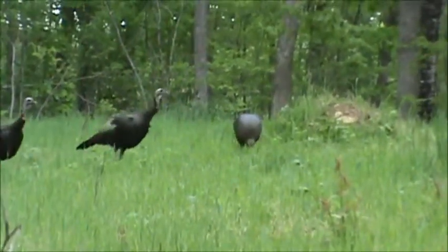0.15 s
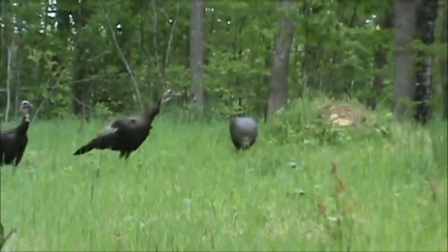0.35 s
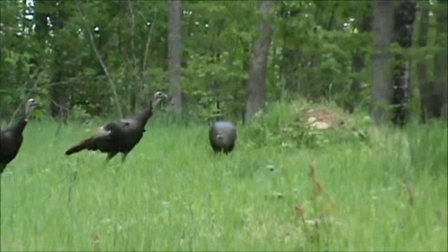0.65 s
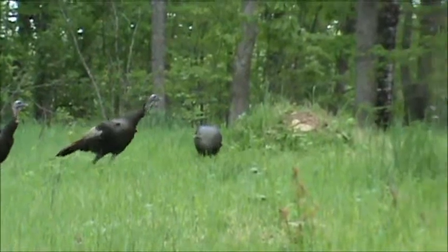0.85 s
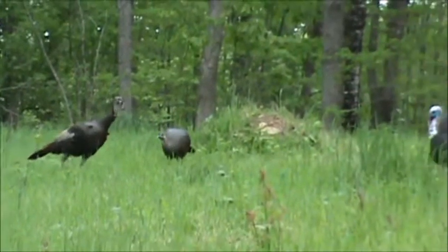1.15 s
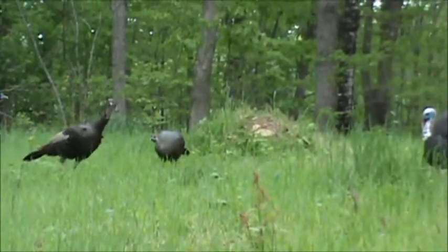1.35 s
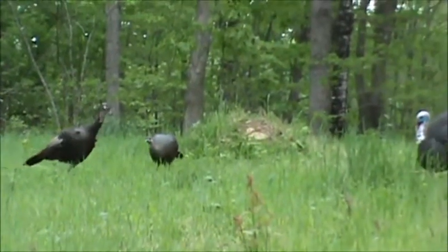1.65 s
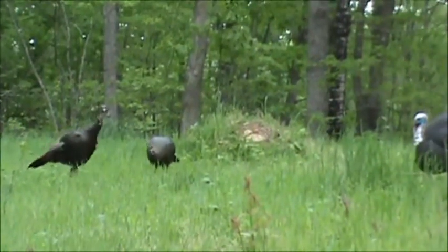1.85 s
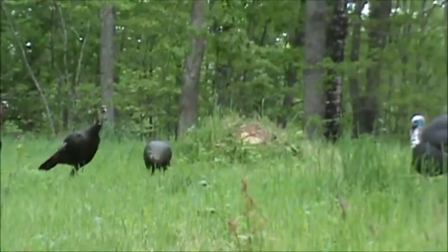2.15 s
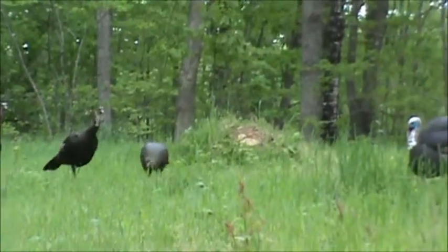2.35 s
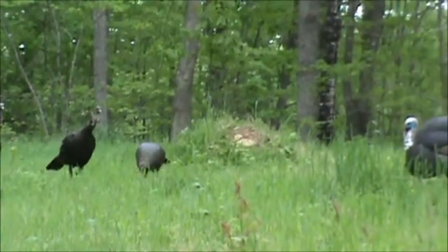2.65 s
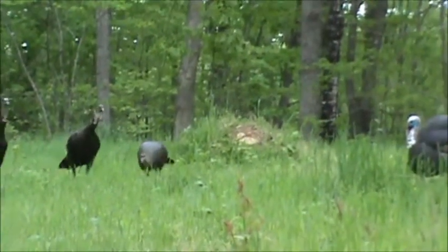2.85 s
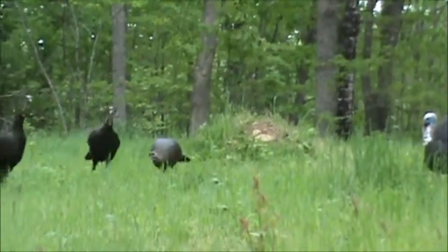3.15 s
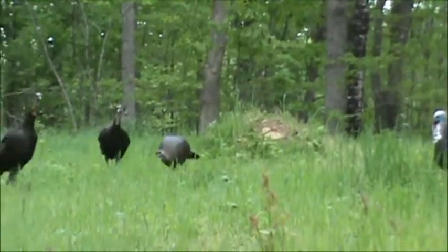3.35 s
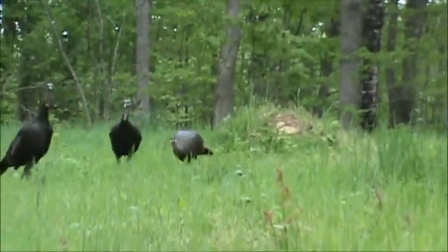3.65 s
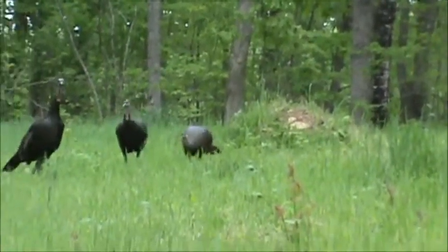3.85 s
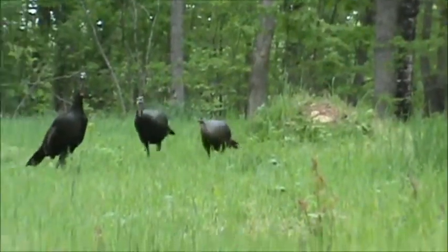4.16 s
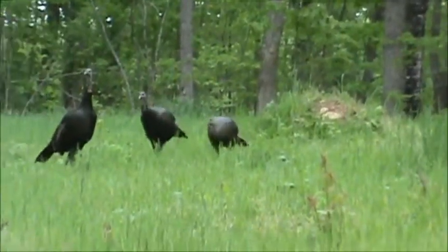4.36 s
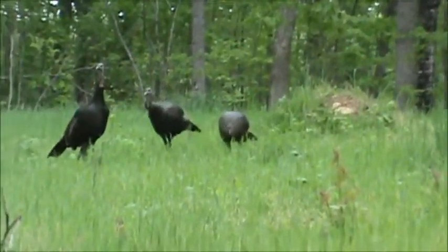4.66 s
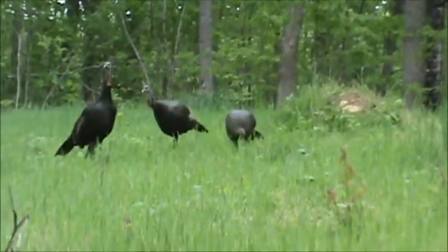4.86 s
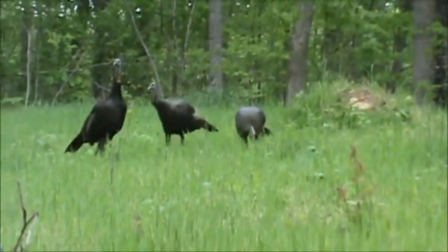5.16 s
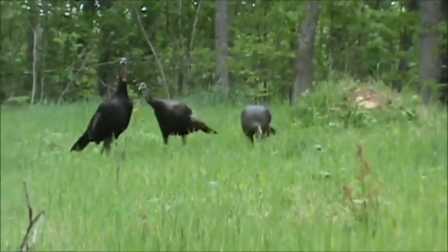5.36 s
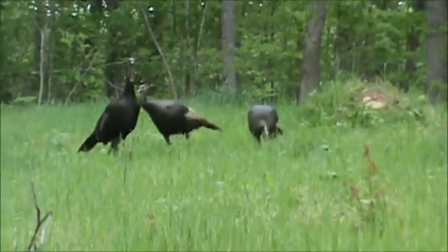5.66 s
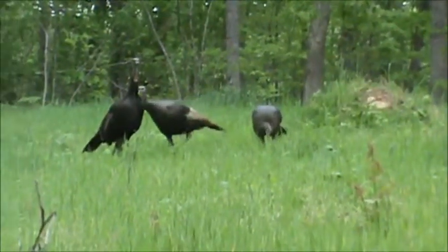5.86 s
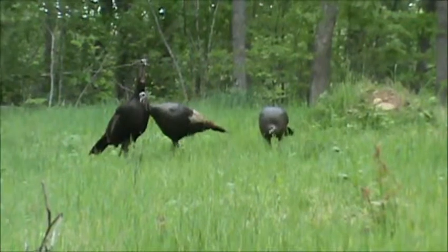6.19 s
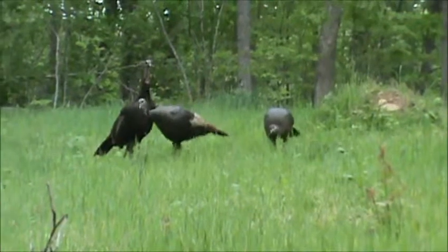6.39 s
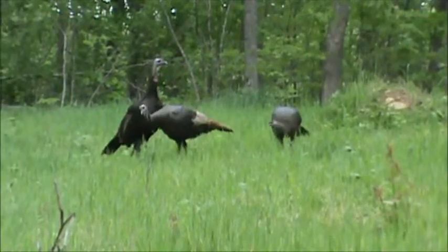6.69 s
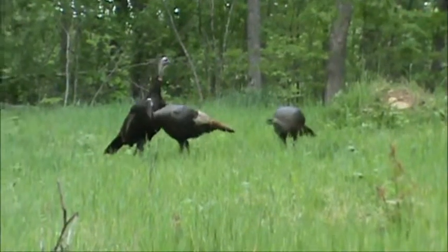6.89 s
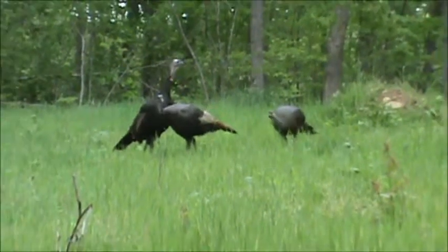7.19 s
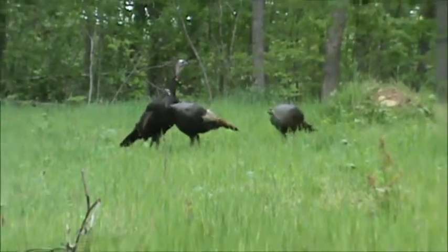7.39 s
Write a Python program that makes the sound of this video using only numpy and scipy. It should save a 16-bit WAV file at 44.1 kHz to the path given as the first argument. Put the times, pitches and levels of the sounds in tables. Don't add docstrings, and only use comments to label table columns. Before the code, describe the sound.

At a spring forest edge, short bird slurs and flute-like notes open over soft hoarse turkey purrs and tiny ticks. A buzzing trill follows, then a warbler on the left repeats a rapid, sharp phrase louder and louder until about three seconds, with a hard knock midway. Afterwards sparser whistles, a buzzy trill and a distant answering warbler remain. Leaves rustle, far traffic rumbles, and a small camcorder adds hiss and a thin high whine.

```python
import sys
import numpy as np
from scipy import signal
from scipy.fft import rfft, irfft
from scipy.io import wavfile
from scipy.ndimage import uniform_filter1d, map_coordinates

SR = 44100
rng = np.random.default_rng(int(sys.argv[2]) if len(sys.argv) > 2 else 0)


def attenuation_scalar(level_db):
    decades = np.asarray(level_db, float) / 20
    return 10 ** decades


def dump(signal):
    limited = np.clip(np.atleast_2d(signal).T, -1, 1)
    pcm = np.round(limited * 32767).astype(np.int16)
    wavfile.write(sys.argv[1], SR, pcm)


N = 332073
TIME = np.arange(N) / SR
OPPOSITE = np.array([[1], [-1]])


def level(x, db):
    return x * attenuation_scalar(db) / np.sqrt(np.mean(x ** 2))


def coloured(points, channels):
    hz, db = np.transpose(points)
    log_hz = np.log(np.fft.rfftfreq(N, 1 / SR) + 1)
    shape = attenuation_scalar(np.interp(log_hz, np.log(hz), db, left=-90, right=-90))
    return irfft(rfft(rng.standard_normal((channels, N))) * shape, N)


def walk(rate_hz):
    hold = int(SR / rate_hz)
    steps = np.repeat(rng.standard_normal(N // hold + 1), hold)
    return uniform_filter1d(uniform_filter1d(steps, hold), hold)[:N]


def ring_twice(x, hz, width_hz):
    b, a = signal.iirpeak(hz, hz / width_hz, fs=SR)
    return signal.lfilter(b, a, signal.lfilter(b, a, x))


def curve(points):
    s, db = np.transpose(points)
    return np.interp(TIME, s, db)


def add_whistle(out, s, hz, db, fade_s):
    span = slice(int(max(s[0], 0) * SR), int(s[-1] * SR))
    t = TIME[span]
    pitch_hz = uniform_filter1d(np.interp(t, s, hz), size=130, mode="nearest")
    from_end_s = np.minimum(t - s[0], s[-1] - t)
    ends = np.sin(np.pi / 2 * np.clip(from_end_s / fade_s, 0, 1))
    tone = np.sin(2 * np.pi * np.cumsum(pitch_hz) / SR)
    out[span] += np.sqrt(2) * attenuation_scalar(np.interp(t, s, db)) * ends * tone


def singer(notes, fade_share, settle=0.85, rounded=0.):
    out = np.zeros(N)
    part = np.linspace(0, 1, num=13)
    left = (1 - rounded) * (1 - part) ** settle + rounded * np.cos(np.pi / 2 * part) ** 2
    for at_s, length_s, start_hz, end_hz, db in notes:
        bend_hz = end_hz + (start_hz - end_hz) * left
        add_whistle(out, at_s + length_s * part, bend_hz, db + 0 * part, fade_share * length_s)
    return out


def leaves():
    # (frequency [Hz], density [dB per Hz])
    air = [(88, -4.5), (150, -1), (273, -1), (330, -2), (861, -5.5), (1320, -6.5), (1680, -5.5),
           (2170, -7.5), (2960, -3), (3510, -12), (9000, -15.5), (11700, -16), (19800, -120)]
    # (peak time [s], half length [s], rise [dB])
    gusts = [
        (0, 0.54, 0.5),
        (1.83, 0.52, 2),
        (2.285, 0.1, 6.5),
        (2.876, 1, 4),
        (3.39, 0.33, 2.5),
        (6.805, 0.39, 0.5),
    ]
    mid, side = level(coloured(air, channels=2), 7.7)
    side = signal.sosfilt(signal.butter(1, 600, "high", fs=SR, output="sos"), side)
    gusts_db = sum(rise_db * np.clip(1 - np.abs(TIME - at_s) / half_s, 0, 1)
                   for at_s, half_s, rise_db in gusts)
    return (mid + 1.19 * side * OPPOSITE) * attenuation_scalar(-61 + gusts_db + walk(9.8))


def road():
    # (frequency [Hz], density [dB per Hz])
    road_spectrum = [(12, -41), (20, -15.5), (51, 3), (81, 3.5), (101, 3.5), (168, -10.5), (220, -15.5),
                     (290, -25.5), (480, -120)]
    # (time [s], level [dB])
    rumble = [(0, -56), (1.9, -51.5), (2.4, -49), (3.6, -49.5), (4.2, -54), (5.6, -54), (7.53, -54)]
    far, wide = level(coloured(road_spectrum, channels=2), 0) * attenuation_scalar(curve(rumble) + 1.5 * walk(1.62))
    return far + attenuation_scalar(-30) * wide * OPPOSITE


def far_vireo():
    # (time [s], length [s], start [Hz], end [Hz], level [dB])
    far_slurs = [(0, 0.0092, 3300, 2200, -54), (.025, 0.03, 2200, 2250, -55.5),
                 (.085, 0.023, 2590, 2870, -53), (.208, 0.012, 2950, 2400, -53),
                 (2.95, 0.035, 3000, 2490, -44.5), (6.6, 0.024, 4000, 2560, -59),
                 (7.425, .035, 3200, 2660, -52), (1.355, 0.034, 3300, 2770, -46.5),
                 (1.39, 0.033, 2774, 3034, -43.5), (2.49, 0.05, 2650, 2950, -45),
                 (2.54, 0.075, 2900, 2365, -43), (2.62, 0.041, 2436, 2150, -46),
                 (2.665, 0.054, 2600, 2300, -42.5), (3.55, .04, 3120, 3600, -61),
                 (3.77, 0.033, 4100, 3530, -57), (4.14, 0.028, 2950, 2330, -51),
                 (4.833, 0.04, 3250, 3800, -57), (7.07, .012, 4540, 4750, -58),
                 (7.18, 0.051, 3600, 4540, -50.5), (7.26, 0.037, 4500, 5380, -54),
                 (7.3, .014, 3100, 2880, -48), (7.325, 0.042, 1990, 2980, -56),
                 (7.38, .035, 3030, 3260, -51)]
    return singer(far_slurs, 0.039, settle=1.05, rounded=0.46)


def far_thrush():
    # (time [s], length [s], pitch [Hz], level [dB])
    flutes = [(.001, 0.041, 1810, -58), (.088, 0.057, 2136, -54), (.11, .032, 2850, -51),
              (0.15, 0.032, 2883, -47), (3.13, 0.15, 1747, -53), (3.341, 0.039, 2910, -46),
              (3.376, 0.04, 2410, -50.5), (3.41, 0.049, 2000, -51), (3.496, 0.035, 2385, -50.5),
              (3.497, 0.017, 2860, -48.5), (3.545, 0.028, 2000, -48.5), (4.844, 0.029, 1557, -60),
              (5.021, 0.028, 1570, -55.5), (5.953, 0.077, 2545, -57), (6.165, 0.04, 2520, -50.5),
              (6.2, 0.085, 2503, -42), (6.295, 0.03, 1886, -52), (6.335, 0.037, 1846, -53),
              (6.375, 0.017, 1910, -51), (6.405, 0.032, 1880, -52), (6.403, 0.025, 2975, -51),
              (6.451, 0.04, 2180, -51.5), (6.513, 0.078, 2966, -55), (6.535, 0.05, 2180, -59),
              (6.551, .045, 2530, -55), (6.93, 0.6, 6640, -68), (4.35, .06, 3900, -53),
              (4.44, .08, 3900, -54), (4.56, .07, 3890, -57)]
    return singer([(at_s, length_s, hz, hz, db) for at_s, length_s, hz, db in flutes], 0.11)


def hen():
    # (peak time [s], swell [s], fade [s], effort [dB], beak brightness [dB])
    purrs = [
        (.02, 0.069, 0.3, -54, -11),
        (.42, 0.14, 0.055, -58, -14),
        (1.389, 0.073, 0.062, -49.5, -16),
        (1.85, 0.072, 0.038, -43, 1.5),
        (1.913, 0.026, 0.04, -40, -4),
        (3.33, 0.21, 0.18, -51.5, -6),
        (3.55, 0.045, .05, -69, -5),
        (3.68, 0.12, 0.13, -55.5, -10),
    ]
    # (frequency [Hz], width [Hz], level [dB])
    throat_rings = [(400, 410, 0.5), (786, 240, 7), (901, 210, 4)]
    throb_hz = 28 + 4 * walk(9.2)
    breath = rng.standard_normal(N) * (1 + 0.18 * np.sin(2 * np.pi * np.cumsum(throb_hz) / SR))
    throat = level(sum(attenuation_scalar(db) * ring_twice(breath, hz, width_hz) for hz, width_hz, db in throat_rings), 0)
    beak = level(ring_twice(breath, 1720, 86), 0)
    out = np.zeros(N)
    for at_s, swell_s, fade_s, effort_db, beak_db in purrs:
        span = slice(max(int((at_s - 2 * swell_s) * SR), 0), int((at_s + 2 * fade_s) * SR))
        t = TIME[span]
        away = np.maximum((at_s - t) / swell_s, (t - at_s) / fade_s)
        effort = attenuation_scalar(effort_db - 10.5 * away ** 1.5)
        out[span] += effort * (throat[span] + attenuation_scalar(beak_db) * beak[span])
    return out


def pecks():
    # (time [s], ring [Hz], ring width [Hz], level [dB])
    blows = [(.145, 6500, 1500, -36), (.1685, 5650, 900, -30), (.1688, 7600, 1200, -29),
             (0.426, 5320, 1200, -26), (.4262, 9000, 1800, -25), (1.93, 11400, 1500, -23),
             (1.5222, 400, 298, -14), (1.524, 1770, 1200, -16), (1.662, 1000, 323, -19),
             (1.7528, 1670, 595, -4.5), (1.753, 7600, 1200, -17), (1.7545, 4830, 1210, -13),
             (1.7572, 1260, 444, -7.5), (1.7578, 3500, 500, -10), (1.758, 6500, 1500, -15),
             (1.7577, 11000, 1500, -23), (1.76, 7500, 1500, -19), (2.337, 258, 210, -24),
             (2.347, 1320, 44.7, -38), (4.6653, 904, 382, -27.5), (4.688, 5150, 1100, -24),
             (4.6925, 5000, 900, -29), (4.6888, 10400, 3500, -21), (4.825, 2360, 900, -21),
             (6.896, 2100, 1200, -23), (2.855, 10000, 2500, -20), (4.976, 2300, 900, -34),
             (5.045, 1900, 700, -31), (5.046, 5300, 900, -34)]
    out = np.zeros(N)
    t = np.arange(1500) / SR
    for at_s, hz, width_hz, db in blows:
        push = 1 - np.exp(-t * hz / 0.45)
        blow = attenuation_scalar(db) * push * np.exp(-np.pi * width_hz * t) * np.sin(2 * np.pi * hz * t)
        b, a = signal.butter(2, 0.6 * hz, "high", fs=SR)
        out[int(at_s * SR):][:len(t)] += signal.lfilter(b, a, blow)
    return out


def vireo():
    # (time [s], length [s], start [Hz], end [Hz], level [dB])
    slurs = [(.215, 0.047, 3810, 5170, -49.5), (.255, 0.033, 5120, 5270, -47.5),
             (.287, .028, 5300, 3800, -46.5), (.312, 0.047, 3786, 2980, -45),
             (.365, 0.05, 2957, 3970, -42.5), (4.002, 0.022, 2510, 2530, -51),
             (4.022, 0.034, 2600, 3750, -48), (4.065, .025, 2870, 3220, -54),
             (4.105, 0.03, 3110, 3750, -48), (4.13, 0.021, 1700, 1870, -58),
             (4.134, 0.01, 3430, 3610, -37.5), (4.143, 0.032, 3600, 3880, -48),
             (4.164, 0.015, 3380, 3570, -32.5), (4.19, 0.039, 2020, 2820, -52),
             (4.202, 0.047, 3557, 3910, -38.5), (4.253, 0.031, 3930, 3620, -41),
             (4.278, 0.02, 3696, 3350, -35), (4.298, .035, 3350, 2620, -38.5),
             (4.335, 0.05, 2983, 3000, -45), (4.47, 0.034, 2960, 2965, -50),
             (4.515, 0.077, 3000, 2950, -54.5), (4.072, 0.021, 3850, 3600, -52),
             (4.352, 0.03, 2700, 2245, -46), (4.385, 0.08, 2303, 2894, -45.5),
             (4.741, 0.048, 2810, 3900, -57), (4.79, 0.035, 3900, 2700, -56),
             (5.275, 0.017, 3860, 3700, -48.5), (5.405, 0.034, 5750, 4450, -49),
             (5.692, .016, 6100, 5750, -48), (5.888, 0.062, 3300, 5300, -47)]
    return singer(slurs, 0.043, settle=1.095, rounded=0.79)


def hidden_vireo():
    # (time [s], length [s], start [Hz], end [Hz], level [dB])
    hidden_slurs = [(.43, 0.054, 3950, 3540, -60), (.482, 0.059, 3580, 3980, -56),
                    (.55, 0.078, 3960, 3400, -56), (1.22, .03, 8600, 6600, -58),
                    (1.33, .03, 8700, 6500, -54), (1.31, 0.049, 3300, 3900, -43.5),
                    (1.41, .03, 3700, 3010, -48), (4.108, 0.022, 4100, 5080, -53),
                    (4.775, .03, 4700, 4100, -66), (1.7, 0.025, 2900, 1895, -47),
                    (5.07, .05, 2600, 3400, -65), (5.278, .04, 3400, 2480, -54),
                    (5.335, .05, 2800, 4000, -54), (5.385, .025, 4300, 5700, -58),
                    (5.755, .06, 3230, 2140, -54), (5.955, .034, 3660, 2650, -53),
                    (6.79, .02, 5000, 3600, -62), (7.1, 0.048, 3000, 4310, -56),
                    (7.125, .04, 4200, 5530, -61), (7.2, .05, 3000, 4600, -59),
                    (7.335, .03, 3000, 4600, -56)]
    return singer(hidden_slurs, 0.11, rounded=0.39)


def thrush():
    # (time [s], length [s], start [Hz],
    # end [Hz], level [dB])
    thrush_notes = [(.62, 0.12, 1930, 2055, -49.5), (.686, 0.014, 2050, 2804, -34),
                    (.694, 0.027, 2807, 2900, -32.5), (.733, 0.04, 3850, 3800, -49),
                    (.875, 0.04, 3900, 3600, -42), (.976, 0.023, 3890, 3510, -34.5),
                    (1.0, .07, 3530, 3430, -47), (1.135, 0.022, 4300, 3450, -40),
                    (1.025, 0.02, 2720, 2580, -39), (1.04, 0.085, 2575, 2550, -38.5),
                    (1.115, 0.12, 2548, 2520, -50), (1.24, 0.059, 2535, 2534, -51),
                    (1.315, .1, 2530, 2520, -52), (1.16, 0.036, 3280, 3300, -45),
                    (1.205, .025, 3296, 3325, -38), (1.245, 0.04, 3300, 3300, -44),
                    (1.27, 0.027, 3560, 3220, -37.5), (5.17, 0.042, 1735, 1700, -52),
                    (5.22, .09, 1690, 1650, -56.5), (5.32, .06, 1680, 1673, -54.5),
                    (5.42, .08, 1670, 1660, -62), (5.385, 0.082, 2336, 2285, -47),
                    (5.295, .04, 1990, 2330, -46.5), (5.325, 0.061, 2324, 2325, -36),
                    (5.405, 0.024, 3570, 3490, -46), (5.43, 0.02, 3530, 3500, -39),
                    (5.448, 0.032, 3420, 3450, -45), (5.452, 0.03, 3040, 3100, -39.5),
                    (5.474, 0.012, 3040, 3024, -32.5), (5.495, 0.043, 2240, 2005, -43.5),
                    (5.55, 0.045, 1990, 1966, -44), (5.68, .06, 2000, 2000, -55),
                    (5.79, .07, 2000, 1990, -57)]
    return singer(thrush_notes, 0.19, settle=1.82)


def warbler():
    # (time from phrase mark [s], pitch [Hz], level [dB])
    syllables = [
        [(-.026, 8920, -10), (-.02, 6860, -7.5), (-.015, 6580, -11), (-.002, 6240, -6.5)],
        [(-.002, 8810, -18.5), (.005, 6890, -5), (.013, 5600, -3.5), (.023, 4850, -3.5), (.033, 4687, -5)],
        [(.084, 8624, -13), (.092, 6174, -9), (.097, 4700, -9), (.103, 3510, -4)],
        [(.104, 3812, -14), (.112, 4474, -2.5), (.123, 5620, -10), (.129, 6000, -7), (.134, 6150, -12)],
        [(.144, 3402, -9), (.153, 3895, -4.5), (.162, 4385, -3.5), (.17, 3843, -1.5), (.179, 3320, -7),
         (.205, 3230, -11)],
    ]
    # (time [s], level [dB])
    song = [
        (0.715, -57),
        (0.985, -42),
        (1.2517, -34),
        (1.5173, -30),
        (1.793, -27.5),
        (2.0686, -27),
        (2.3505, -25.5),
        (2.6321, -25.5),
        (2.914, -26),
    ]
    out = np.zeros(N)
    for at_s, db in song:
        drift = .006 * rng.standard_normal()
        short_db = max(-25 - db, 0)
        pace = 1 - min(0.006 * short_db, .042)
        for k, syllable in enumerate(syllables):
            s, hz, rel_db = np.transpose(syllable)
            rising = k == 3
            top_db = short_db * 9.0 * np.clip(hz / 6400 - 1, 0, 1)
            loss_db = [top_db + 1.8 * short_db,
                       top_db,
                       4 * max(short_db - 5.5, 0),
                       -0.29 * short_db,
                       0][k]
            lift = min(.005 * short_db, .035) * rising
            s = at_s + pace ** (1 + rising) * s
            add_whistle(out, s, hz * (1 + drift + lift), db + rel_db - loss_db, fade_s=0.0018)
    return out


def trills():
    # (time [s], length [s], level [dB])
    trill_times = [
        (0.745, 0.235, -36.5),
        (1.303, 0.069, -39),
        (5.742, 0.48, -42),
        (5.708, 0.51, -45),
        (5.744, .25, -53),
    ]
    # (repeat rate [Hz], first sweep start [Hz], first sweep end [Hz])
    voices = [
        (139.5, 4090, 4050),
        (167, 3500, 3880),
        (21, 5850, 5640),
        (274.5, 5270, 2850),
        (21, 7470, 8700),
    ]
    notes = []
    for (at_s, length_s, db), (rate_hz, start_hz, end_hz) in zip(trill_times, voices):
        repeats_s = np.arange(0, length_s, 1 / rate_hz)
        repeats_s += .0003 * rng.standard_normal(len(repeats_s))
        sweep_s = min(0.96 / rate_hz, .014)
        for s in repeats_s:
            sag = 1 - .11 * s
            notes.append((at_s + s, sweep_s, start_hz * sag, end_hz * sag, db - 30 * s))
    return singer(notes, 0.24)


def far_warbler():
    # (time from mark [s], length [s], start [Hz], end [Hz], level [dB])
    turns = [
        (-.133, 0.03, 3690, 3480, -6.5),
        (-.078, 0.022, 3740, 3486, -6),
        (-.064, 0.0284, 3138, 2633, -3),
        (0, 0.0179, 2700, 3003, -2),
        (.012, .03, 3017, 2910, -1),
        (0.045, .026, 2570, 2007, -10),
    ]
    # (time [s], level [dB])
    far_song = [
        (1.625, -49),
        (1.895, -45.5),
        (2.17, -42),
        (2.442, -41.5),
        (2.728, -41.5),
        (3.022, -57),
        (6.675, -49),
        (6.945, -47),
        (7.222, -46),
        (7.487, -45),
    ]
    notes = []
    for at_s, db in far_song:
        for s, length_s, start_hz, end_hz, rel_db in turns:
            if at_s + s + length_s < N / SR:
                notes.append((at_s + s, length_s, start_hz, end_hz, db + rel_db))
    return singer(notes, 0.024, settle=2.2)


def forest(x, pan_db, near_db, near_s, far_db, shared=.4, dull=0.13, sway_ms=.012):
    t = np.arange(int(1.5 * SR)) / SR
    chance = rng.standard_normal((2, 3, len(t)))
    chance = np.sqrt(shared) * chance[:, 2:] + np.sqrt(1 - shared) * chance[:, :2]
    near = chance[0] * (np.abs(chance[1]) > 1.2) * np.exp(-t / near_s)
    tail = (1 - np.exp(-t / 0.0052)) * attenuation_scalar(-60 * t / 0.98)
    far = signal.lfilter([1], [1, -dull], chance[1] * tail)
    near = near / np.linalg.norm(near, axis=1, keepdims=True)
    far = far / np.linalg.norm(far, axis=1, keepdims=True)
    echoes = attenuation_scalar(near_db) * near + attenuation_scalar(far_db) * far
    path = np.arange(N) + sway_ms / 1000 * SR * walk(150)
    stirred = map_coordinates(x, [path], order=2)
    scatter = signal.fftconvolve(stirred[None], echoes, axes=1)[:, :N]
    return (x + scatter) * attenuation_scalar(pan_db / 2 * OPPOSITE)


def scene():
    flutter = attenuation_scalar(2.5 * walk(260))
    mild = np.sqrt(flutter)
    far_birds = far_vireo() + far_warbler()
    birds = forest(flutter * far_birds, pan_db=-4, near_db=1.5, near_s=0.01, far_db=1.5, sway_ms=.05)
    birds += forest(mild * far_thrush(), pan_db=-5, near_db=0.0, near_s=0.012, far_db=-4.5, sway_ms=.03)
    birds += forest(mild * vireo(), pan_db=2.5, near_db=-5.5, near_s=0.011, far_db=1.5)
    birds += forest(flutter * hidden_vireo(), pan_db=1.25, near_db=7.5, near_s=.025, far_db=7, sway_ms=.18)
    birds += forest(thrush() + mild * trills(), pan_db=5.5, near_db=-1.0, near_s=0.0082, far_db=0.0)
    birds += forest(flutter * attenuation_scalar(3 * walk(900)) * warbler(), pan_db=4.8, near_db=4.5, near_s=0.006,
                    far_db=5.5, dull=-0.35, shared=.45, sway_ms=.08)
    ground = forest(hen(), pan_db=2.5, near_db=-32.0, near_s=0.0067, far_db=-18.0)
    ground += forest(pecks(), pan_db=2.5, near_db=-7, near_s=.003, far_db=-15)
    return birds + ground + leaves() + road()


def circuit():
    # (frequency [Hz], density [dB per Hz])
    hiss_spectrum = [(880, -7.0), (1500, -10.5), (2160, 0.5), (2980, 1.5), (6720, -4.5), (13600, -2.5),
                     (15600, 0.0), (16700, -24)]
    # (time [s], hiss level [dB])
    gain_db = [(0, -56), (1.1, -54.5), (2.2, -52), (3.1, -52), (3.8, -55), (6.2, -55), (7.53, -56)]
    common, apart = coloured(hiss_spectrum, channels=2)
    hiss = level(common + attenuation_scalar(-12) * apart * OPPOSITE, 4.87)
    whine = np.sqrt(2) * attenuation_scalar(-5.5 + 0.71 * walk(20)) * np.sin(2 * np.pi * 15734.3 * TIME)
    return attenuation_scalar(curve(gain_db)) * (hiss + whine)


def top_cut(x):
    return signal.sosfilt(signal.butter(12, 15745, fs=SR, output="sos"), x)


def record(dry):
    side = (dry[0] - dry[1]) / 2
    low_side = signal.sosfiltfilt(signal.butter(2, 10500, fs=SR, output="sos"), side)
    narrowed = dry - (side - low_side) * OPPOSITE
    low_pass = signal.ellip(8, .2, 70, 1.006 * 15745, fs=SR, output="sos")
    return top_cut(signal.sosfilt(low_pass, narrowed + circuit()))


dry = scene()
out = record(dry)
dump(out)
```